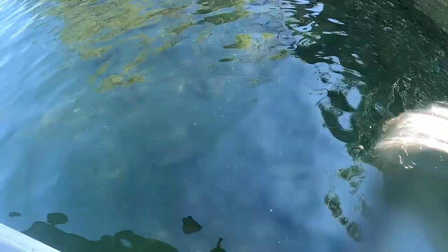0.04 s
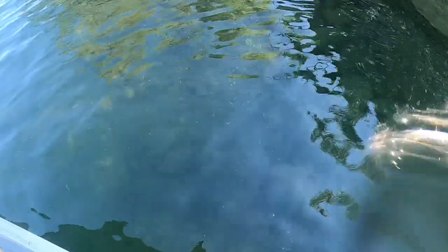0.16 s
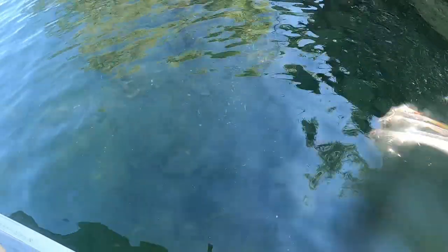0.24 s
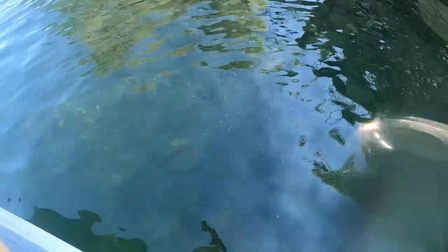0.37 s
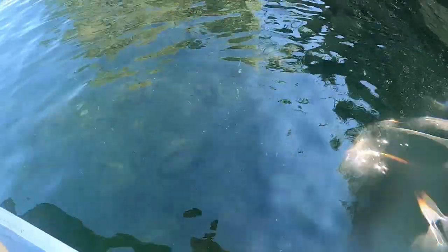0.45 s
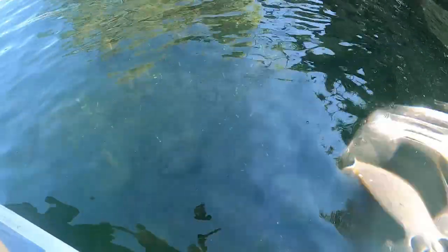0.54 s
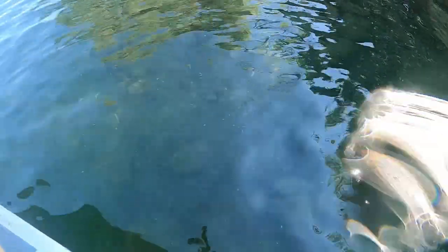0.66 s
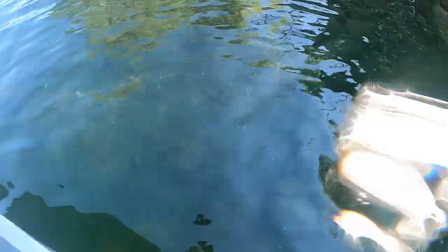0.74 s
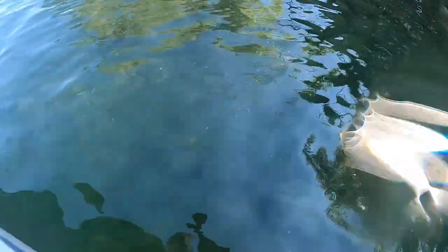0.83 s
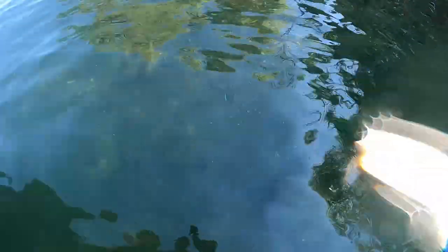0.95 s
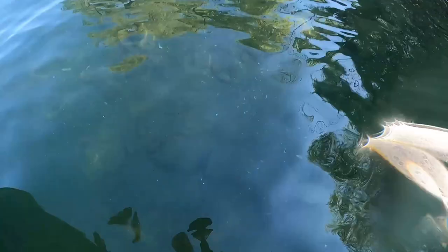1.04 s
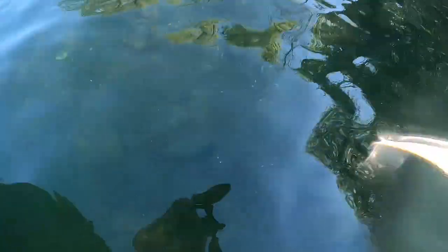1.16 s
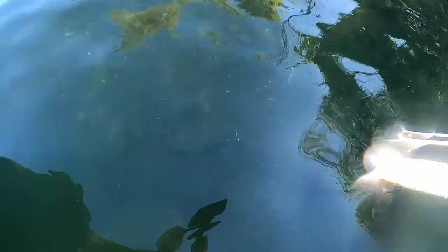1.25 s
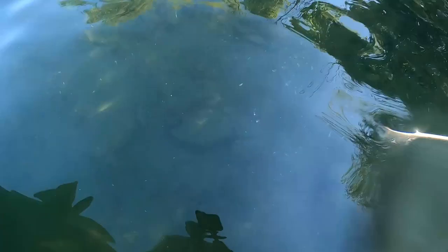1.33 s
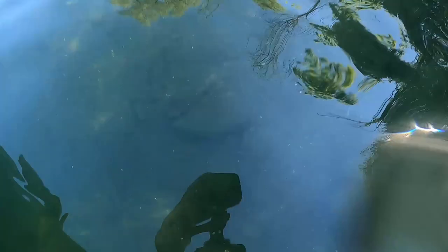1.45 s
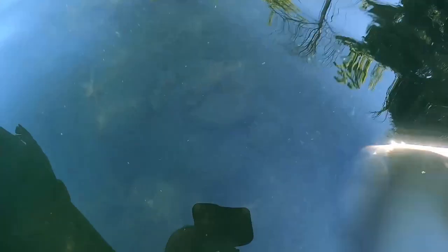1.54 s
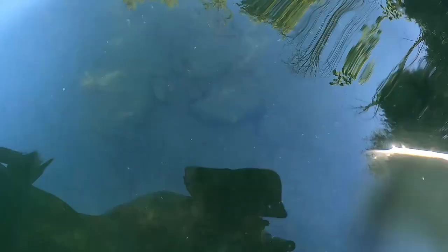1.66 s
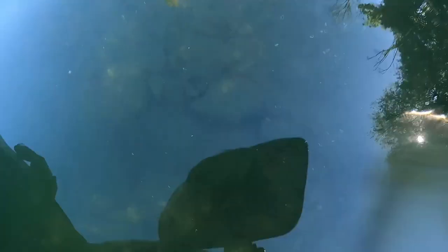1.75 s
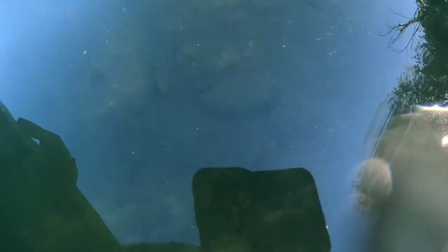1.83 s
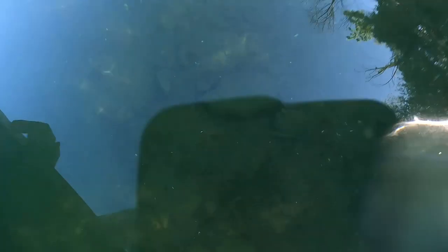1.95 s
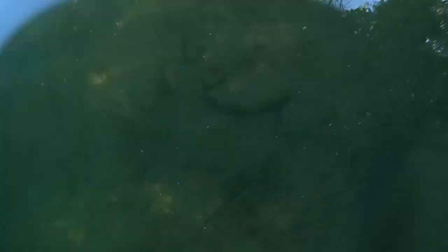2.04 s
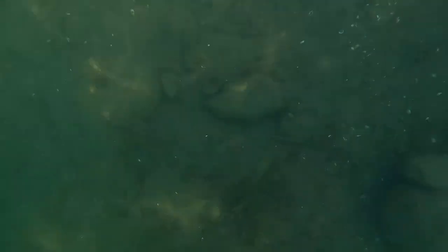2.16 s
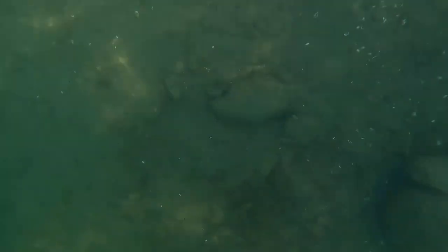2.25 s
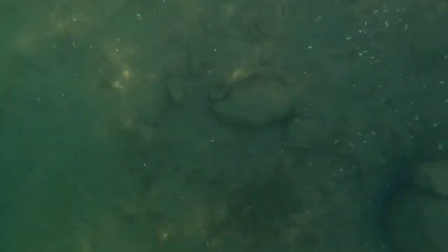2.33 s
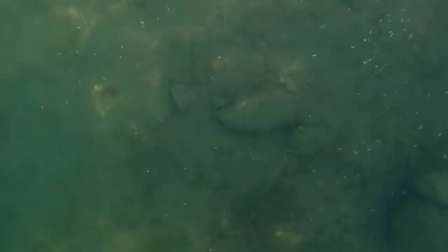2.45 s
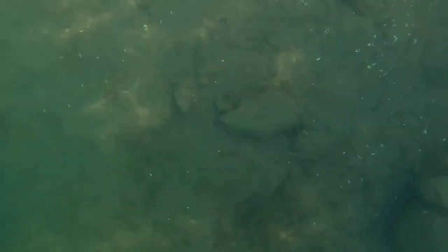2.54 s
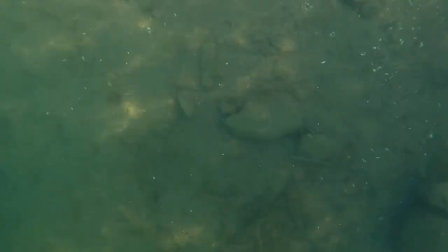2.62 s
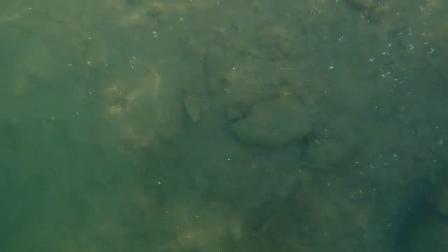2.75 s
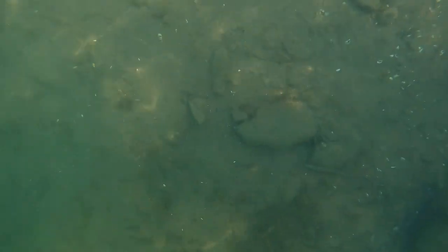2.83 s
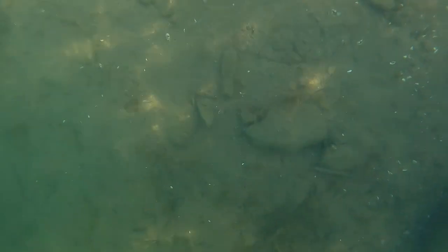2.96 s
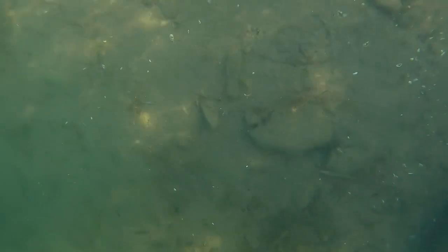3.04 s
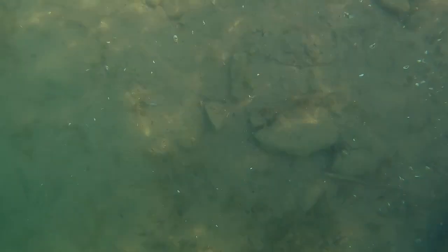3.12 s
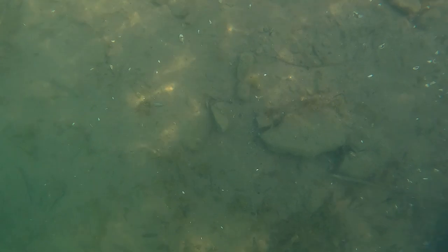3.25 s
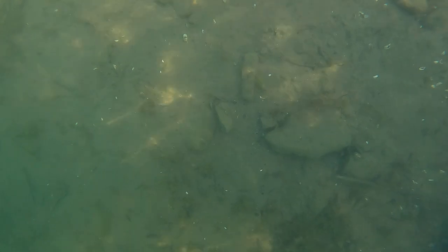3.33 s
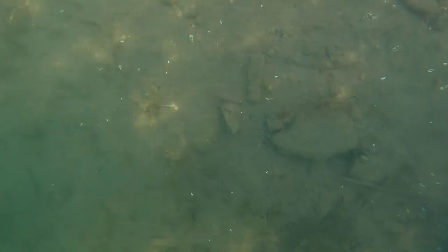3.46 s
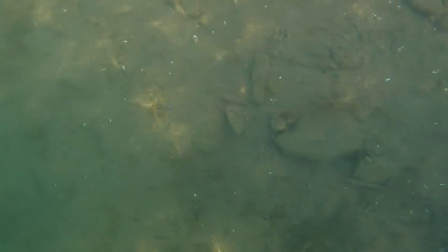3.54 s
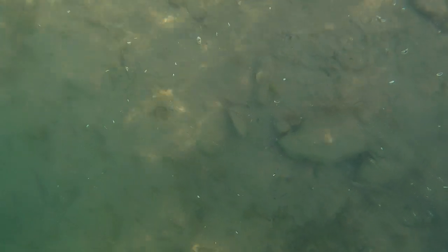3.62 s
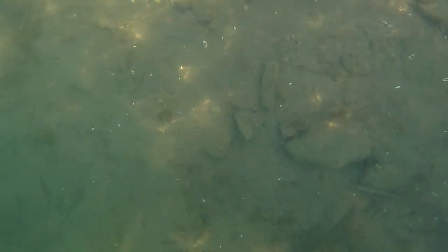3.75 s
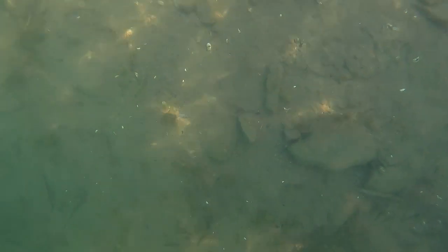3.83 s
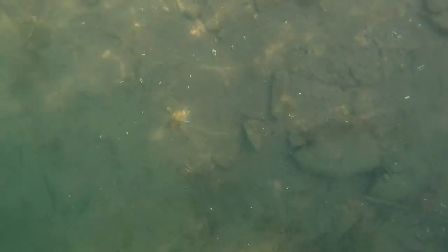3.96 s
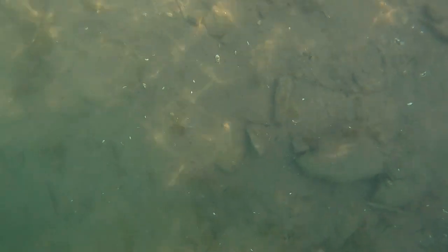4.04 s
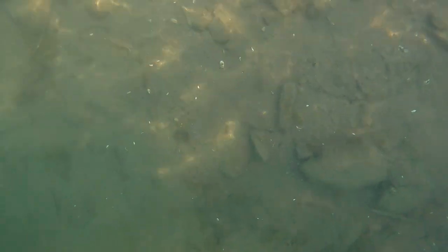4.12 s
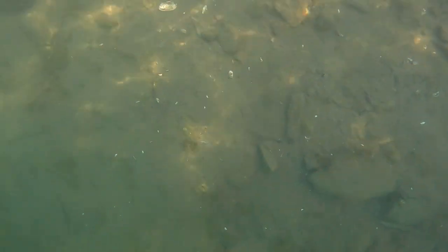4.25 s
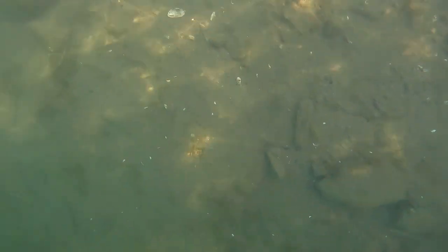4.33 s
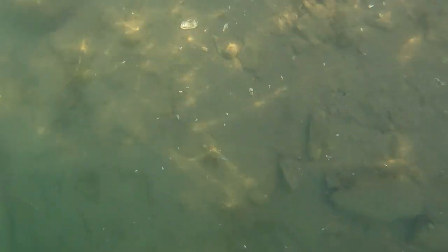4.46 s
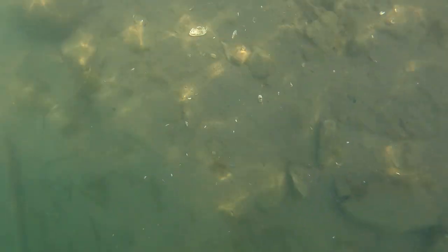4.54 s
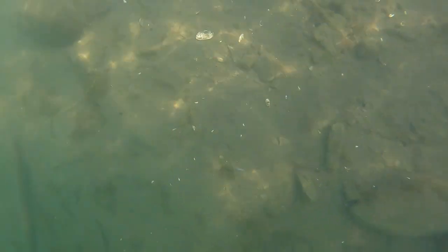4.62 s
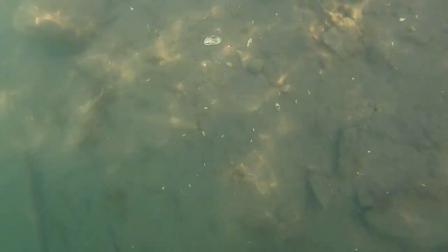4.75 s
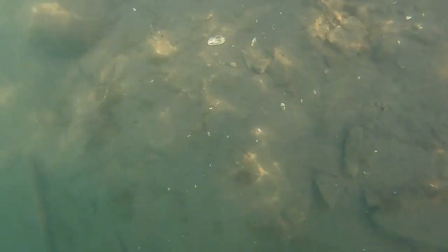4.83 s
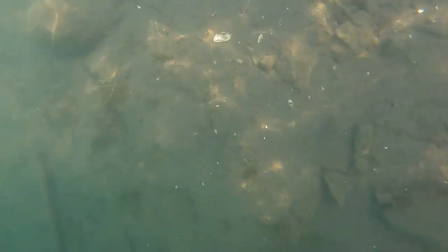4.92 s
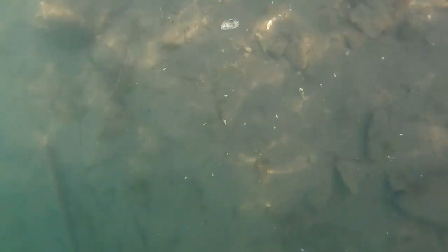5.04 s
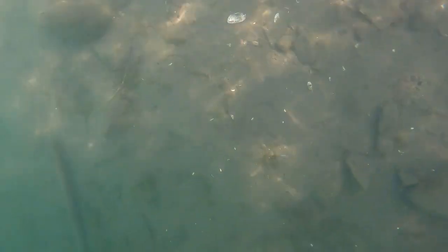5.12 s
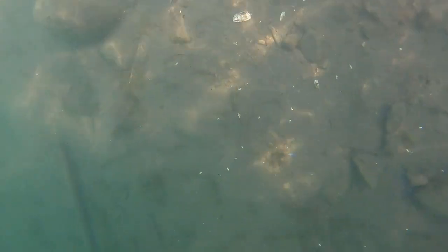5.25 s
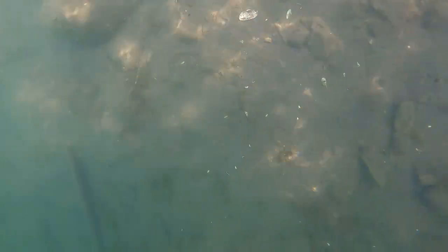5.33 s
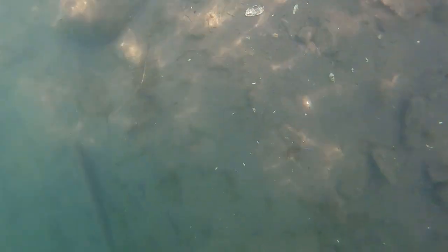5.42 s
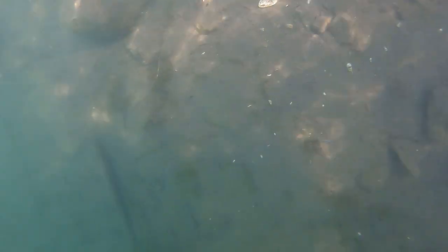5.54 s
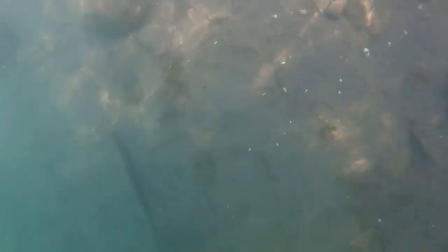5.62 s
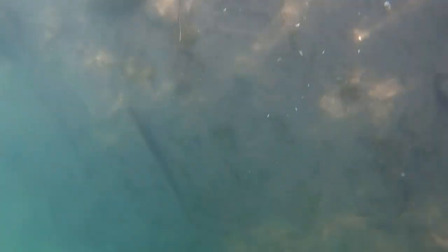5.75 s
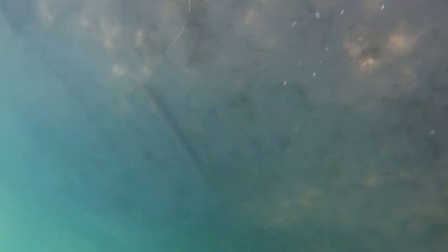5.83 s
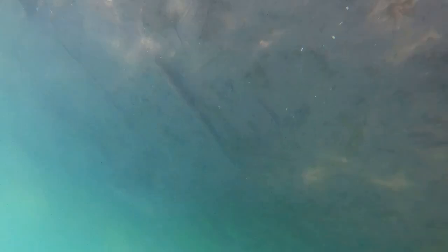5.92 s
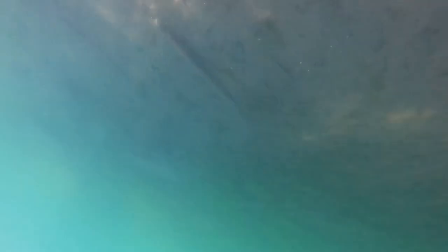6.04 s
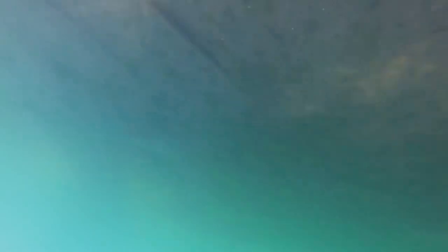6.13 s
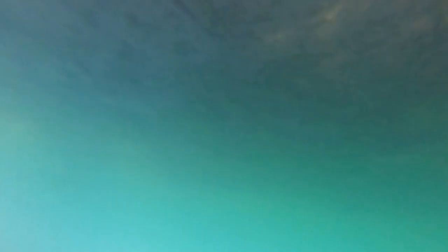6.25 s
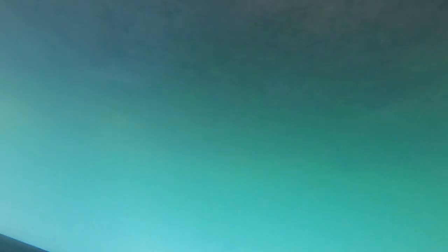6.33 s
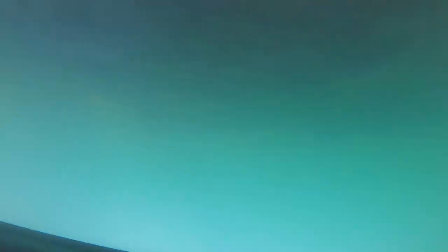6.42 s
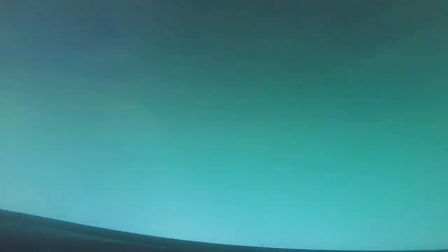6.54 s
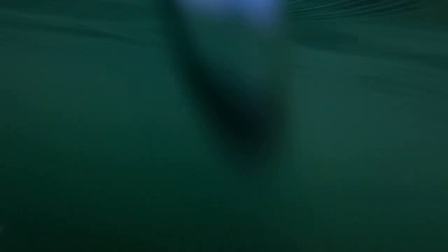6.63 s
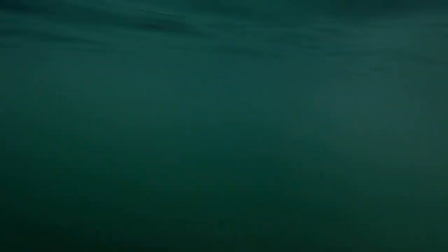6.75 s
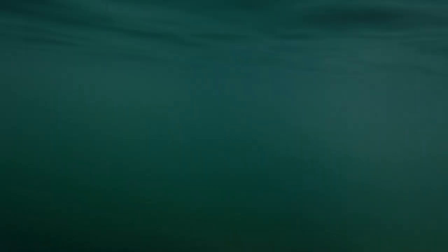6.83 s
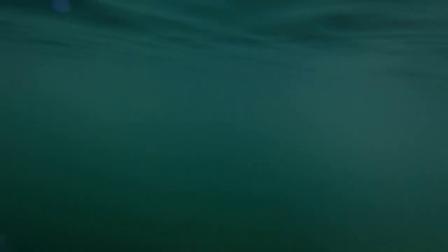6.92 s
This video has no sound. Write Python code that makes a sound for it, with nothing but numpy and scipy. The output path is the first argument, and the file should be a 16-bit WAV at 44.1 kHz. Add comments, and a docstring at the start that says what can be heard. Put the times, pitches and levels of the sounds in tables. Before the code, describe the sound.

Close on a waterproof case held over a river, faint ripples hiss and hollow knocks and wet plips tap the housing. At about two seconds it plunges in with clustered knocks, spatter and ringing gurgles. Underwater everything turns dull: low throbbing flow, soft slosh and sparse bubbles. A broad swash rumbles past after five seconds, then bubbles and knocks thicken towards a very loud snap and deep gulps.

```python
"""A waterproof camera is held over a river: ripples hiss, fingers and small waves knock on its case, surges wash it.
At 2.2 s it is dipped in: water spatters, closes with a thump, and trapped air gurgles away as ringing bubbles.
Swept along under water, it hears eddies throb on the housing and dull slosh; at 5.2 s a swash rumbles along it.
At 6.65 s, near the surface, a film of water snaps hard across the port, and the last large bubbles gulp.
Eddies, churn and sheets are coloured noise or bubble crowds; knocks, bubbles and droplets are decaying sines."""
import sys
import numpy as np
from scipy import signal
from scipy.io import wavfile
from scipy.ndimage import uniform_filter1d, minimum_filter1d

SR = 44100
rng = np.random.default_rng(int(sys.argv[2]) if len(sys.argv) > 2 else 0)


def transcribe(signal):
    """Save signal, clipped to [-1, 1], as a 16-bit WAV file at the path in sys.argv[1]."""
    frames = np.atleast_2d(signal).T
    limited = np.clip(frames, -1, 1)
    pcm = np.round(limited * 32767).astype(np.int16)
    wavfile.write(sys.argv[1], SR, pcm)


N = 307818
TIME = np.arange(N) / SR


def amp(db):
    """Logarithmic level: decibels to amplitude gain."""
    return 10 ** (np.asarray(db) / 20)


def unit(x):
    """Normalisation by mean power: the rms becomes one."""
    return x / np.sqrt(np.mean(x ** 2) + 1e-20)


def level(rows):
    """Level envelope: a curve linear in dB, as a gain at every sample."""
    return amp(np.interp(TIME, *np.transpose(rows)))


def colour(x, points):
    """Minimum-phase filtering: a causal filter with the given spectrum; the result has an rms of one."""
    hz, db = np.transpose(points)
    f = abs(np.fft.fftfreq(8192, 1 / SR))
    log_gain = np.log(amp(np.interp(np.log(f + 1), np.log(hz), db)))
    # the Hilbert transform of the log gain supplies the phase
    taps = np.fft.ifft(np.exp(np.conj(signal.hilbert(log_gain)))).real
    causal_taps = taps[:len(taps) // 2]
    return unit(signal.oaconvolve(x, causal_taps)[:len(x)])


def drift(hz):
    """Slow random modulation: straight lines between 2 * hz random points a second, with an rms of one."""
    at = np.arange(0, N, SR / hz / 2)
    return unit(np.interp(np.arange(N), at, rng.standard_normal(N)[:len(at)]))


def add(mix, s, sound):
    """Superposition: mixes a sound in at time s."""
    part = mix[max(round(s * SR), 0):][:len(sound)]
    part += sound[:len(part)]


def ring(t, hz, t60):
    """Damped oscillation: a struck sine that falls by 60 dB in t60."""
    return np.sin(2 * np.pi * hz * t) * np.exp(-np.log(1000) * t / t60)


def patter(per_s, spread_db):
    """Random impulse process: impacts of either sign and uneven size, with an rms of one."""
    size = amp(spread_db * np.minimum(rng.exponential(1, N), 3))
    sign = rng.choice([-1, 1], N)
    struck = rng.random(N) < per_s / SR
    return unit(size * sign * struck)


def crowd(lo_hz, hi_hz, cycles, per_s, spread_db, count=28):
    """Bubble resonance: random bubbles of many sizes; each rings for some cycles and rises a little."""
    t, out = np.arange(SR // 6) / SR, np.zeros(N)
    for hz in np.geomspace(lo_hz, hi_hz, count):
        t60 = cycles / hz
        onset = 1 - np.exp(-t * hz)
        bubble = ring(t, hz * (1 + .08 * t / t60), t60) * onset
        out += signal.oaconvolve(patter(per_s, spread_db), hz * bubble)[:N]
    return unit(out)


# flow pressing on the housing, following the speed of the sweep: (t/s, level/dB before rocking)
FLOW_LEVEL = [(0, -74), (0.22, -46), (0.8, -34), (1.42, -48.5), (2.0, -34), (2.35, -35.5), (2.7, -31.5),
              (2.9, -36), (2.97, -29.5), (3.25, -33.5), (3.45, -29), (3.55, -32.5), (3.68, -21),
              (3.86, -25.5), (3.95, -27.5), (4.2, -23.5), (4.31, -32.5), (4.38, -11.5), (4.54, -21),
              (4.63, -23), (4.8, -26), (5.14, -18), (5.25, -24.5), (5.5, -20.5), (5.7, -31), (5.95, -16.5),
              (6.5, -18.5), (6.7, -45), (6.84, -17), (6.98, -22.5)]
# spectrum of the ragged buffeting: (f/Hz, relative level per Hz/dB)
BUFFET_SPECTRUM = [(10, -18), (25, 4.5), (50, -1), (70, -1.5), (100, -10), (160, -19.5), (400, -93.5)]
# the camera rocks, faster as the sweep goes on: rate at one crest in Hz, time of that crest in s
ROCK_HZ, CREST_S = 2.681, 3.84
ROCK_HZ_PER_S, ROCK_DB = 0.25, 3  # how quickly the rocking speeds up; swell of the flow either way
THROB_UNEVEN_DB = 2


def flow(throb_hz=50.06, wander=0.055, throb_db=-1, buffet_db=-1):
    """Vortex shedding: eddies leave the housing as a near-regular throb in the steady sweep, else ragged buffeting."""
    steady = np.interp(TIME, [2.4, 3.5, 4.9, 5.4], [0.2, 0.81, 0.8, 0.045]).clip(0, 1)
    turns = np.cumsum(throb_hz * (1 + wander * drift(hz=9.2))) / SR
    uneven = amp(THROB_UNEVEN_DB * drift(hz=8.7))
    throb = amp(throb_db) * unit(np.sin(2 * np.pi * turns) * uneven)
    buffet = amp(buffet_db) * colour(rng.standard_normal(N), BUFFET_SPECTRUM)
    since = TIME - CREST_S
    rock_turns = ROCK_HZ * since + ROCK_HZ_PER_S * since ** 2 / 2
    rocking = amp(ROCK_DB * np.cos(2 * np.pi * rock_turns))
    # power is shared between the two
    return level(FLOW_LEVEL) * rocking * (np.sqrt(steady) * throb + np.sqrt(1 - steady) * buffet)


# surges of water washing round the case: (start t/s, length/s, slosh level/dB, spray level/dB)
SURGE_EVENTS = [(0.234, 0.09, -41, -56.5), (0.481, 0.32, -35.5, -56.5), (1.362, 0.064, -38.5, -48),
                (1.515, 0.052, -59, -56), (2.405, 0.085, -34, -65), (2.698, 0.03, -36, -53),
                (3.341, 0.053, -35.5, -72), (4.315, 0.33, -32.5, -77), (4.978, 0.077, -24.5, -66.5),
                (5.116, 0.055, -23.5, -76), (6.204, 0.12, -23.5, -59.5), (6.473, 0.05, -30, -54),
                (6.754, 0.022, -20.5, -42.5), (6.808, 0.07, -22.5, -64.5)]
SURGE_ATTACK_S, SURGE_T60 = 0.0087, 0.055  # both in s


def surges():
    """Power addition: gains of slosh and of spray in the surges; each builds quickly, holds, then settles."""
    power = np.zeros((2, N))
    for s, length, slosh_db, spray_db in SURGE_EVENTS:
        attack = np.clip((TIME - s) / SURGE_ATTACK_S, 0, 1)
        release = amp(-60 * np.clip((TIME - s - length) / SURGE_T60, 0, 2))
        power += (attack * release * amp([[slosh_db], [spray_db]])) ** 2
    return np.sqrt(power)


# water stirring between the surges: (t/s, slosh level/dB)
WATER_LEVEL = [(0, -97), (0.1, -57), (0.26, -44), (1.25, -46), (1.85, -40), (2.15, -38), (2.36, -34.5),
               (2.47, -28.5), (2.56, -39), (2.8, -49), (3.1, -42.5), (3.6, -47.5), (4.9, -38.5),
               (5.55, -32), (5.76, -41.5), (5.98, -31.5), (6.5, -25), (6.6, -30), (6.72, -37), (6.84, -39),
               (6.98, -35)]
# spectra of the slosh above and below the surface: (f/Hz, relative level per Hz/dB)
SLOSH_AIR_SPECTRUM = [(40, -16.5), (90, 10), (160, 1.5), (230, -0.5), (330, -5), (500, -11.5), (750, -9),
                      (1050, -34.5), (1500, -37), (2200, -39.5), (3500, -42), (6000, -83)]
SLOSH_UNDER_SPECTRUM = [(50, -19.5), (100, 10.5), (150, 6.5), (380, -0.5), (470, -4), (580, -14.5),
                        (860, -25), (1020, -30), (1200, -55), (1400, -50.5), (1750, -44), (2100, -58),
                        (3300, -74.5), (6000, -100.5)]
PLUNGE_S, SUBMERGE_S = 2.19, 0.1  # start of the plunge; time for the water to close over the case
UNDER = np.clip((TIME - PLUNGE_S) / SUBMERGE_S, 0, 1)  # 0 in the air, 1 once submerged


def slosh(air_db=0, under_db=0, gurgle=0.3, lumpy_db=1.0):
    """Bubble resonance in churning water: ringing bubbles amid noise, duller once the camera is under."""
    big = crowd(lo_hz=130.9, hi_hz=1934, cycles=47.0, per_s=24, spread_db=2.5)
    lumps = amp(lumpy_db * drift(hz=22.36))
    churn = (gurgle * big + rng.standard_normal(N) / 2) * lumps
    in_air = amp(air_db) * colour(churn, SLOSH_AIR_SPECTRUM)
    submerged = amp(under_db) * colour(churn, SLOSH_UNDER_SPECTRUM)
    strength = np.hypot(level(WATER_LEVEL), surges()[0])
    return strength * ((1 - UNDER) * in_air + UNDER * submerged)


# the big swash along the housing: (t/s, level/dB)
SWASH_LEVEL = [(5.1, -120), (5.18, -34.5), (5.256, -15.5), (5.263, -11), (5.38, -14.5), (5.44, -18),
               (5.485, -14.5), (5.53, -19.5), (5.59, -39), (5.8, -120)]
# its spectrum before evening: (f/Hz, relative level per Hz/dB)
SWASH_SPECTRUM = [(50, -21.5), (130, 2), (250, 0.5), (380, -1), (490, -7), (660, -26), (830, -23),
                  (1080, -36.5), (1250, -49), (1480, -55), (1720, -48.5), (2000, -63), (3300, -77.5),
                  (6000, -100)]


def swash(swash_db=0):
    """Broadband flow noise: a sheet of water runs along the housing with a full, fairly even rumble."""
    rumble = colour(rng.standard_normal(N), SWASH_SPECTRUM)
    smooth_power = uniform_filter1d(uniform_filter1d(rumble ** 2, size=500), size=500)
    strength = np.sqrt(smooth_power + 1e-9)
    even = unit(rumble / np.sqrt(strength))  # halves the swings in level, in dB
    return amp(swash_db) * level(SWASH_LEVEL) * even


# hiss of the surface between the surges, fading with depth: (t/s, spray level/dB)
SURFACE_LEVEL = [(0, -100), (0.1, -69), (0.27, -58.5), (0.7, -61.5), (0.95, -56.5), (2.0, -61.5),
                 (2.19, -50), (2.33, -70), (2.42, -63.5), (2.8, -67.5), (3.9, -67), (5.25, -67),
                 (5.72, -75.5), (5.92, -59), (6.56, -53), (6.98, -79)]
# spectrum of the spray: (f/Hz, relative level per Hz/dB)
SPRAY_SPECTRUM = [(500, -3.5), (1000, 13.5), (1800, -3), (2400, -8.5), (3500, -13), (5000, -19.5),
                  (7500, -30.5), (15000, -53)]
CALM_UNTIL_S = 1.5  # the ripples stay smooth until then


def spray(spray_db=-1, foam_db=-56, clumps_db=3):
    """Noise breaking into resonances: calm ripples hiss evenly; stronger spray holds more tiny ringing bubbles."""
    strength = np.hypot(level(SURFACE_LEVEL), surges()[1])
    foam = strength ** 2 / (strength ** 2 + amp(foam_db) ** 2)
    foam = foam * np.where(TIME < CALM_UNTIL_S, 0.1, 1)
    tiny = crowd(lo_hz=900, hi_hz=3600, cycles=50, per_s=14, spread_db=2.5)
    prickle = np.sqrt(foam) * tiny / 2 + np.sqrt(1 - foam) * rng.standard_normal(N)
    clumps = amp(clumps_db * np.sqrt(foam) * drift(hz=45))
    unrest = amp(1.8 * drift(hz=11))
    return amp(spray_db) * strength * unrest * colour(prickle * clumps, SPRAY_SPECTRUM)


# clusters of tiny bubbles: (start t/s, length/s, level/dB, middle f/Hz, spread of pitch/octaves)
FIZZ_CLUSTERS = [(1.351, 0.087, -50.5, 1447, 0.23), (1.41, 0.067, -43.5, 852, 0.25),
                 (1.362, 0.018, -62, 3660, 0.25), (1.373, 0.033, -67, 2480, 0.3),
                 (1.527, 0.086, -56, 1490, 0.42), (2.231, 0.087, -49.5, 1565, 0.2),
                 (2.268, 0.04, -38.5, 1022, 0.27), (2.234, 0.069, -68, 2700, 0.12),
                 (2.307, 0.016, -63.5, 2950, 0.071), (2.403, 0.028, -66, 1660, 0.21),
                 (2.706, 0.053, -64, 1970, 0.38), (5.887, 0.028, -71, 1900, 0.48),
                 (6.189, 0.025, -64.5, 1980, 0.44), (4.381, 0.033, -61, 1650, 0.11),
                 (6.252, 0.026, -54.5, 2160, 0.12), (6.324, 0.03, -71, 3160, 0.2),
                 (6.438, 0.03, -49.5, 1790, 0.1), (6.499, 0.076, -53, 1114, 0.19),
                 (6.52, 0.083, -63.5, 2560, 0.27), (6.754, 0.024, -52, 2420, 0.55)]
FIZZ_PER_S = 260


def fizzes(fizz_db=0, cycles=22, spread_db=3, chirp=0.043):
    """Bubble resonance in clusters: quick overlapping pings, scattered in pitch and size, each rising a little."""
    t, out = np.arange(SR // 30) / SR, np.zeros(N)
    for s, length, db, middle_hz, octaves in FIZZ_CLUSTERS:
        count = int(FIZZ_PER_S * length) + 2
        cluster = np.zeros(round(length * SR) + len(t))
        for k, (when, pitch, size) in enumerate(rng.random((100, 3))[:count]):
            hz = middle_hz * 2 ** (octaves * 2 * (pitch - .5) * np.sqrt(3))
            t60 = cycles / hz
            onset = 1 - np.exp(-(t * hz / 2) ** 2)
            ping = ring(t, hz * (1 + chirp * np.minimum(t / t60, 1)), t60) * onset
            add(cluster, length * (k + when) / count, ping * amp(-spread_db * np.log(size + .05)))
        # the level refers to the cluster's length without its tail
        tail_share = np.sqrt(length * SR / len(cluster))
        add(out, s, amp(db + fizz_db) * unit(cluster) * tail_share)
    return out


# spectrum of flying droplets, also used by the plunge: (f/Hz, relative level per Hz/dB)
SPATTER_SPECTRUM = [(700, 3), (1700, 4.5), (3300, -8.5), (5000, -15.5), (8000, -38.5), (15000, -43)]
# droplets and tiny bubbles bursting on the case: (t/s, level/dB before ping and scatter gains, starting f/Hz, t60/s)
DROP_EVENTS = [(1.395, -32.5, 2650, 0.016), (1.522, -31, 2130, 0.025), (1.573, -34, 2070, 0.032),
               (1.838, -54, 3500, 0.022), (2.1, -43, 3350, 0.031), (2.116, -37, 3130, 0.019),
               (2.189, -26, 3650, 0.014), (2.373, -43, 1590, 0.019), (2.512, -48, 2600, 0.017),
               (2.732, -35.5, 2110, 0.042), (4.088, -58, 1640, 0.069), (5.425, -40, 1754, 0.052),
               (6.263, -38, 2290, 0.022), (6.332, -44, 2980, 0.02), (6.351, -51, 3600, 0.045),
               (6.448, -43, 2010, 0.036), (6.52, -31.5, 2880, 0.016), (6.579, -30.5, 2890, 0.022),
               (6.664, -20, 1297, 0.045), (6.733, -49, 2320, 0.044)]
SCATTER_T60 = 0.039  # s


def drops(ping_db=-4, scatter_db=-18, rise=0.00062, chirp=0.71):
    """Damped resonance: a short, unsteady ping that rises a little, with a scatter of finer droplets."""
    t, out = np.arange(SR // 8) / SR, np.zeros(N)
    scatter = colour(patter(per_s=2500, spread_db=2), SPATTER_SPECTRUM)
    tremble = drift(hz=250)
    onset = 1 - np.exp(-(t / rise) ** 2)
    for s, db, hz, t60 in DROP_EVENTS:
        at = rng.integers(N - len(t)) + np.arange(len(t))
        ping = amp(ping_db) * np.sin(2 * np.pi * hz * t * (1 + chirp * t) + .5 * tremble[at])
        fine = scatter[at] * amp(db + scatter_db - 60 * t / SCATTER_T60)
        add(out, s, (ping * amp(db - 60 * t / t60) + fine) * onset)
    return out


# dry ticks of water tapping the case: (t/s, level/dB before the common gain, top of the ring f/Hz)
TICK_EVENTS = [(0.726, -23.5, 1700), (1.350, -22.5, 1600), (1.394, -38, 2960), (1.406, -23, 1400),
               (1.523, -50, 3050), (1.575, -36.5, 2300), (1.838, -49, 4700), (2.12, -27, 1700),
               (2.149, -46.5, 4600), (2.161, -49, 5200), (2.17, -47.5, 5000), (2.205, -40, 3200),
               (2.216, -31, 3100), (2.229, -20, 3300), (2.281, -52, 5860), (2.311, -55, 5800),
               (2.373, -42.5, 3100), (2.528, -39.5, 2000), (2.598, -29, 1420), (2.659, -50, 2500),
               (2.674, -38, 2000), (2.723, -15, 2050), (2.725, -27, 3450), (2.749, -45, 2400),
               (2.807, -39, 1700), (2.875, -39, 1300), (2.932, -65, 2000), (3.128, -47, 2000),
               (3.294, -42.5, 1750), (4.128, -44.5, 2100), (5.260, -23.5, 2300), (5.323, -44.5, 3200),
               (5.422, -35, 2000), (5.887, -28, 1100), (6.103, -51, 2000), (6.195, -38, 3100),
               (6.28, -43, 2400), (6.332, -21.5, 1050), (6.351, -20, 1100), (6.401, -35, 1900),
               (6.521, -31, 3000), (6.551, -46.5, 3800), (6.581, -30, 3000), (6.604, -48, 3700),
               (6.765, -19, 1590), (6.768, -37, 5000), (6.77, -34.5, 4470), (6.815, -46, 3400)]
# the ring of a tick: (multiple of its top frequency, relative level per Hz/dB)
TICK_SPECTRUM = [(0.1, -10), (0.35, 12), (0.701, -1.5), (1, -4.5), (1.3, -22), (2.201, -30), (4.999, -61)]


def ticks(tick_db=-1, tick_t60=0.019, rise=0.00059):
    """Impact noise: a tap of water gives a crack of a few milliseconds, muffled above its ring."""
    t, out = np.arange(SR // 16) / SR, np.zeros(N)
    onset = 1 - np.exp(-(t / rise) ** 2)
    for s, db, hz in TICK_EVENTS:
        spectrum = [(k * hz, ring_db) for k, ring_db in TICK_SPECTRUM]
        crack = colour(rng.standard_normal(len(t)), spectrum)
        add(out, s, crack * amp(db + tick_db - 60 * t / tick_t60) * onset)
    return out


# water film snapping across the microphone port: (t/s, step level/dB)
SNAP_EVENTS = [(2.1846, -28), (2.7277, -42), (6.6535, -4.5)]


def snaps(port_hz=435, port_t60=0.057):
    """Step excitation of a resonance: the pressure at the port jumps in one step and swings back."""
    t, out = np.arange(SR // 20) / SR, np.zeros(N)
    for s, db in SNAP_EVENTS:
        add(out, s, np.cos(2 * np.pi * port_hz * t) * amp(db - 60 * t / port_t60))
    return out


def plunge(splash_db=-39, closing=0.044, spit_db=-24, spit_t60=0.4, squirt_db=-40, squirt_t60=0.0295,
           thump_db=-14, thump_hz=60, thump_t60=0.13):
    """Water entry: spatter until the water closes with a thump, then faint spit; trapped air squirts with a high hiss."""
    t = np.arange(SR // 4) / SR
    spatter = colour(patter(per_s=3000, spread_db=3)[:len(t)], SPATTER_SPECTRUM)
    spit = amp(spit_db - 60 * t / spit_t60)
    still_open = 1 / (1 + (t / closing) ** 16)
    splash = spatter * amp(splash_db) * np.minimum(t / .008, 1) * (spit + still_open)
    # spectrum of the squirt: (f/Hz, relative level per Hz/dB)
    squirt_spectrum = [(9000, -43.0), (11200, -22), (12000, 1.0), (15500, -8), (16500, -26)]
    hiss = colour(rng.standard_normal(len(t)), squirt_spectrum)
    thump = amp(thump_db) * ring(np.maximum(t - closing / 2, 0), thump_hz, thump_t60)
    return splash + thump + hiss * amp(squirt_db - 60 * t / squirt_t60)


# large bubbles: (t/s where swell turns to decay, level/dB before pinch and unrest, f/Hz before pinch and glide,
# swell/s, t60/s, initial glide/octaves per s, force of the pinch-off 0-1)
BUBBLE_EVENTS = [(0.511, -31.5, 765, 0.0052, 0.1, -2, 0.08), (0.540, -19, 718, 0.008, 0.12, 0.5, 0.16),
                 (0.729, -22.5, 700, 0.0045, 0.031, 1.5, 0), (0.752, -37, 724, 0.0057, 0.26, 0, 0),
                 (0.783, -28, 692, 0.0093, 0.083, -0.5, 0), (1.355, -24.5, 930, 0.0029, 0.056, -0.5, 0.05),
                 (1.373, -35, 1040, 0.0037, 0.18, -5, 0.05), (1.376, -39, 673, 0.004, 0.16, 5, 0),
                 (1.408, -26, 1250, 0.00046, 0.022, -1.5, 0), (1.43, -26, 335, 0.005, 0.2, 0.5, 0.26),
                 (1.58, -34.5, 1520, 0.002, 0.028, 0.8, 0.03), (1.593, -44, 950, 0.003, 0.07, -2, 0.13),
                 (2.247, -34, 1720, 0.0012, 0.048, -6, 0.27), (2.270, -11, 790, 0.0011, 0.024, -2.5, 0.46),
                 (2.273, -20, 601, 0.0034, 0.088, 4.5, 0), (2.284, -31.5, 1000, 0.003, 0.053, -0.5, 0.4),
                 (2.283, -37.5, 1836, 0.0013, 0.022, 3, 0.2), (2.293, -18, 330, 0.005, 0.055, -0.5, 0.4),
                 (2.31, -38, 1390, 0.004, 0.025, 1.5, 0.2), (2.309, -44, 1850, 0.002, 0.03, 2, 0.1),
                 (2.314, -21.5, 318, 0.0027, 0.1, 1.5, 0.2), (2.335, -23, 330, 0.004, 0.11, -1, 0),
                 (2.326, -27.5, 520, 0.0046, 0.046, 3.5, 0.1), (2.348, -37, 624, 0.004, 0.06, -2, 0.3),
                 (2.358, -25, 368, 0.0027, 0.047, 1, 0.1), (2.38, -31, 532, 0.0042, 0.069, -5, 0.2),
                 (2.397, -35, 680, 0.003, 0.084, 3, 0.1), (2.444, -27, 400, 0.0032, 0.053, 1, 0),
                 (2.496, -27, 230, 0.003, 0.047, 1, 0.05), (2.474, -26.5, 560, 0.0016, 0.062, -3.5, 0.1),
                 (2.598, -16, 612, 0.0086, 0.12, -1, 0.72), (2.599, -14.5, 975, 0.00032, 0.033, 3, 0.02),
                 (2.599, -30.5, 1386, 0.0018, 0.074, 5, 0.22), (2.606, -48.5, 1850, 0.011, 0.02, 0, 0),
                 (2.675, -13, 727, 0.00066, 0.019, 2.5, 0.06), (2.686, -36, 850, 0.003, 0.039, -13, 0.1),
                 (2.714, -35, 1050, 0.0021, 0.045, 11.5, 0.22), (2.725, -21, 717, 0.00086, 0.01, 4.5, 0.17),
                 (2.725, -25, 1250, 0.001, 0.013, 5, 0.15), (2.726, -29, 1800, 0.0036, 0.035, 5, 0),
                 (2.728, -64, 3250, 0.0095, 0.062, -5, 0.4), (3.004, -35, 940, 0.0027, 0.029, 6.5, 0.57),
                 (3.026, -37, 800, 0.0041, 0.055, 6, 0.16), (4.345, -39.5, 775, 0.0058, 0.083, 4.5, 0),
                 (4.488, -34.5, 660, 0.014, 0.051, -1, 0.36), (4.56, -28, 650, 0.004, 0.031, 3, 0),
                 (4.994, -40.5, 1050, 0.0031, 0.087, -3.5, 0), (5.112, -26, 598, 0.0093, 0.22, 1.5, 0.42),
                 (5.264, -23.5, 850, 0.003, 0.059, -3, 0.14), (5.263, -30, 1740, 0.001, 0.032, -1.5, 0.13),
                 (5.427, -35.5, 1716, 0.00078, 0.022, -2, 0.17),
                 (5.907, -29.5, 680, 0.0031, 0.033, 0.5, 0.63), (6.03, -26, 590, 0.0029, 0.073, -3.5, 0.22),
                 (6.2, -25.5, 700, 0.0016, 0.079, -4.5, 0.13), (6.277, -25, 660, 0.0039, 0.037, 0, 0.02),
                 (6.403, -32.5, 1930, 0.0032, 0.026, -6, 0.1), (6.449, -26, 1880, 0.0015, 0.028, 1, 0.02),
                 (6.465, -39, 1860, 0.004, 0.06, -1, 0), (6.472, -26.5, 1550, 0.0013, 0.028, -2, 0),
                 (6.483, -22, 880, 0.0012, 0.055, 7.5, 0.39), (6.496, -27.5, 1020, 0.0051, 0.026, 8, 0.13),
                 (6.671, 0, 191, 0.0018, 0.013, 1.5, 0.17), (6.671, -9, 410, 0.0057, 0.058, 2, 1),
                 (6.728, -46, 1320, 0.0015, 0.12, -3.5, 0.07), (6.771, -1, 412, 0.0068, 0.088, 4.5, 1),
                 (6.84, -33.5, 470, 0.011, 0.1, 0.5, 0), (6.89, -19, 348, 0.0084, 0.051, 2, 0.3)]
MID_HZ = 700  # pitch of a middling bubble
GLIDE_S, UNREST_DB = 0.11, 1.3  # the glide levels off after this time; wavering of a middling bubble's level
# at pinch-off a bubble is briefly louder and flatter: length in s, boost in dB, share of pitch lost, at full force
PINCH_S, PINCH_DB, PINCH_SAG = 0.0038, 8, 0.19


def bubbles(bubble_db=0.1, wobble=0.016):
    """Volume resonance: an air pocket swells into its note, gulps as it pinches off, then dies away in a glide."""
    t, out = np.arange(-SR // 16, SR // 5) / SR, np.zeros(N)
    shake, squeeze = drift(hz=110), drift(hz=130)
    for s, db, hz, swell, t60, glide, force in BUBBLE_EVENTS:
        at = rng.integers(N - len(t)) + np.arange(len(t))
        toss = np.sqrt(hz / MID_HZ)  # small bubbles are tossed about more than large ones
        pinch = force * np.exp(-(t / PINCH_S) ** 2)
        gliding_hz = hz * 2 ** (glide * GLIDE_S * np.tanh(t / GLIDE_S))
        pitch = gliding_hz * (1 + wobble * toss * shake[at] - PINCH_SAG * pinch)
        growth, decay = t / swell, -np.log(1000) * t / t60
        envelope = np.exp(-np.logaddexp(-2 * growth, -2 * decay) / 2)  # the lesser of the two, with a rounded top
        size = amp(db + bubble_db + PINCH_DB * pinch + UNREST_DB * toss * squeeze[at])
        add(out, s + t[0], size * envelope * np.sin(2 * np.pi * np.cumsum(pitch) / SR))
    return out


# spectra of the wake along the case and of a wet slap: (f/Hz, relative level per Hz/dB)
WAKE_SPECTRUM = [(40, -23), (110, -3), (200, 12), (330, 3), (480, 1.5), (700, -12.5), (1000, -37),
                 (1400, -35), (2200, -49.5), (5000, -72), (9000, -100)]
SLAP_SPECTRUM = [(250, -17.5), (520, 7), (720, 8.5), (1000, -1.5), (1300, -24), (1800, -23.5), (2500, -41),
                 (4000, -51.5), (8000, -85), (12000, -100)]
# knocks and slaps on the case: (t/s, strength/dB, f/Hz, share of wet slap/dB, t60 of slap and wake/s)
KNOCK_EVENTS = [(0.535, -13, 204, -35, 0.36), (0.605, -16, 237, -33, 0.048), (0.668, -12, 178, -38, 0.14),
                (0.729, -5.5, 183, -28.5, 0.12), (0.834, -25, 232, -15, 0.089), (1.18, -37.5, 503, 2, 0.11),
                (1.348, -28.5, 447, -5, 0.16), (1.407, -13, 246, -12, 0.27),
                (1.572, -50.5, 406, 16.5, 0.077), (2.021, -25.5, 151, -29, 0.051),
                (2.196, -3.5, 257, -8.5, 0.088), (2.207, -5, 278, -9, 0.074),
                (2.217, -2.5, 245.5, -2, 0.04), (2.228, -4, 141.4, -11, 0.089),
                (2.248, -7.5, 304, -21, 0.06), (2.275, -11.5, 266, -12.5, 0.13),
                (2.418, -17, 327, -33, 0.19), (2.468, -16, 312, -45, 0.29),
                (2.602, -11.5, 151.5, -8, 0.096), (2.634, -20, 172, -23, 0.045),
                (2.657, -31, 427, -4.5, 0.11), (2.676, -14.5, 235, -8.5, 0.097),
                (2.724, -21.5, 134, -9, 0.16), (2.807, -34.5, 458, -1.5, 0.07),
                (2.931, -26.5, 447, -11, 0.086), (2.999, -29.5, 187, -6.5, 0.27),
                (3.128, -26, 177, -4.5, 0.073), (3.15, -36, 300, -3.5, 0.32),
                (3.336, -33, 434, -10.5, 0.091), (3.352, -25, 359, -24.5, 0.24),
                (3.935, -39.5, 338, -8.5, 0.31), (4.074, -25.5, 210, -16, 0.29),
                (4.333, -23, 408, -14, 0.31), (4.456, -14.5, 200, -35, 0.19),
                (4.558, -12.5, 233, -36, 0.19), (4.971, -21.5, 255, -29, 0.085),
                (5.109, -14, 314, -15.5, 0.17), (5.262, -12.5, 233, -2.5, 0.12),
                (5.655, -14, 182, -33.5, 0.13), (5.798, -22.5, 222, -24, 0.98),
                (5.89, -8, 291, -24.5, 0.37), (5.975, -17.5, 130, -14, 0.17),
                (6.026, -25, 114, -11.5, 0.22), (6.197, -27, 109, -1, 0.19), (6.216, -9.5, 235, -35, 0.28),
                (6.281, -7.5, 215, -21, 0.04), (6.401, -19.5, 363, -4.5, 0.077),
                (6.449, -16.5, 307, -8, 0.17), (6.481, -21, 420, -4, 0.1), (6.512, -3.5, 128, -15, 0.042),
                (6.541, -12.5, 134, -11, 0.047), (6.818, -20, 484, -8.5, 0.085)]


def knocks(push_db=1, push_t60=0.056, wake_db=-10, slap_db=-5, rise=0.002):
    """Impact excitation: each knock pushes the case for a few cycles, slaps the water and leaves a low wake."""
    t, out = np.arange(SR // 3) / SR, np.zeros(N)
    wake = colour(rng.standard_normal(N), WAKE_SPECTRUM)
    slap = colour(rng.standard_normal(N), SLAP_SPECTRUM)
    onset = 1 - np.exp(-(t / rise) ** 2)
    for s, db, hz, wet_db, t60 in KNOCK_EVENTS:
        at = rng.integers(N - len(t)) + np.arange(len(t))
        push = amp(push_db) * ring(t, hz, push_t60)
        water = wake[at] * amp(wake_db) + slap[at] * amp(slap_db + wet_db)
        add(out, s, amp(db) * (push + water * amp(-60 * t / t60)) * onset)
    return out


def scene():
    """Superposition: all that reaches the one microphone."""
    mix = flow() + slosh() + swash() + spray()
    mix += fizzes() + drops() + ticks() + snaps()
    add(mix, PLUNGE_S, plunge())
    mix += bubbles() + knocks()
    return mix[None]


CEILING, EDGE_HZ = 0.76, 16100  # limiter ceiling as amplitude; edge of the band


def record(dry):
    """Peak limiting and band limiting: a fast limiter holds down the largest peaks, then a low-pass follows."""
    allowed = CEILING / np.maximum(abs(dry), CEILING)
    lowest = minimum_filter1d(allowed, size=300)
    gain = uniform_filter1d(uniform_filter1d(lowest, size=150), size=150)
    low_pass = signal.firwin(255, EDGE_HZ, window=("kaiser", 9), fs=SR)
    return signal.oaconvolve(dry * gain, low_pass[None], "same")


dry = scene()
out = record(dry)
transcribe(out)
```